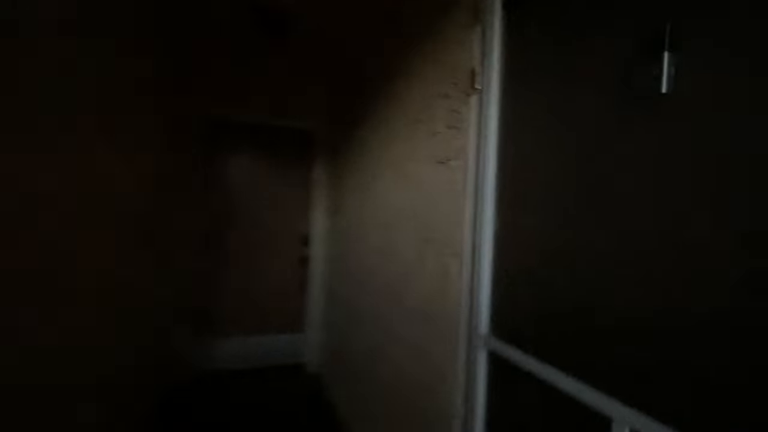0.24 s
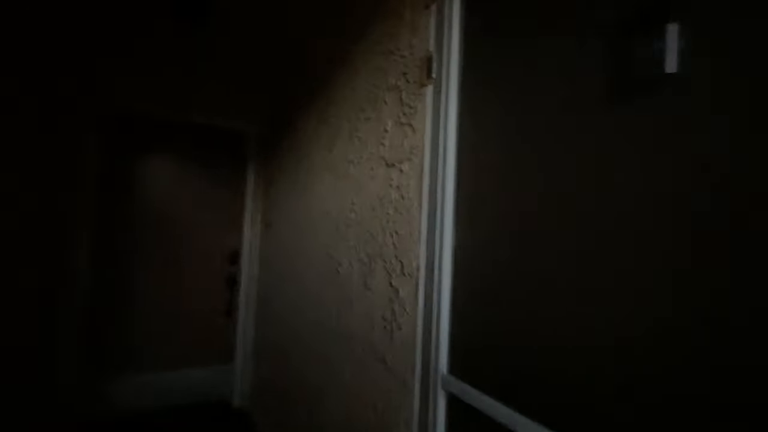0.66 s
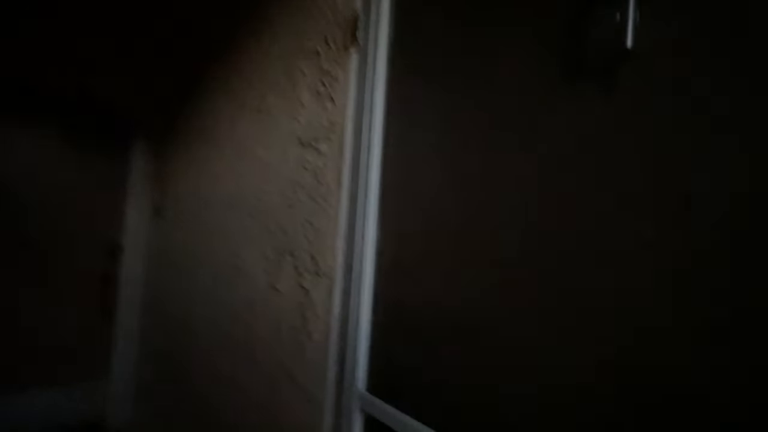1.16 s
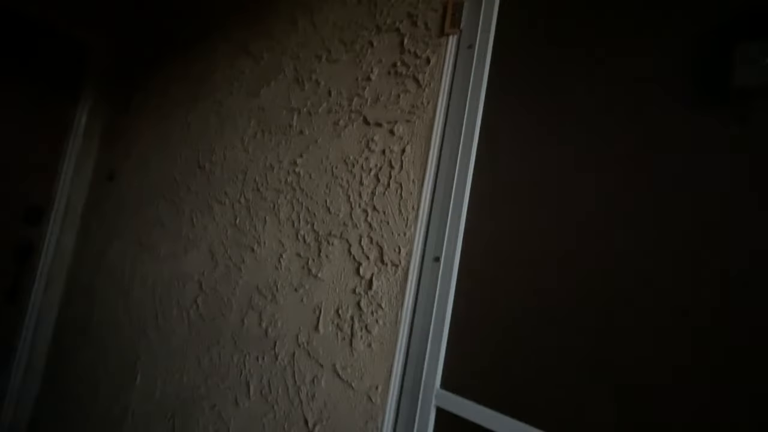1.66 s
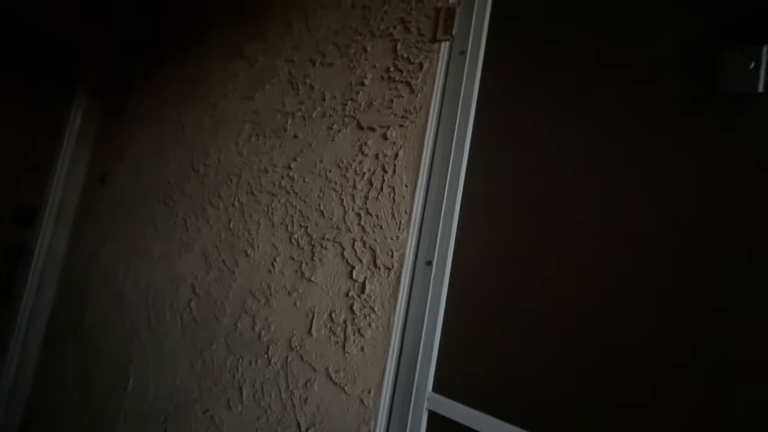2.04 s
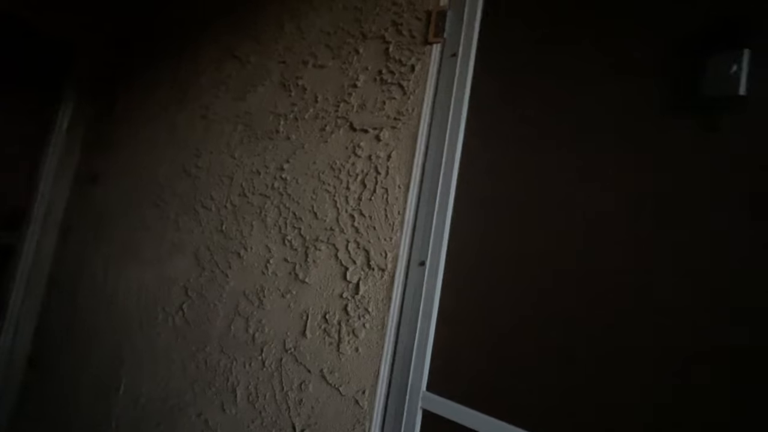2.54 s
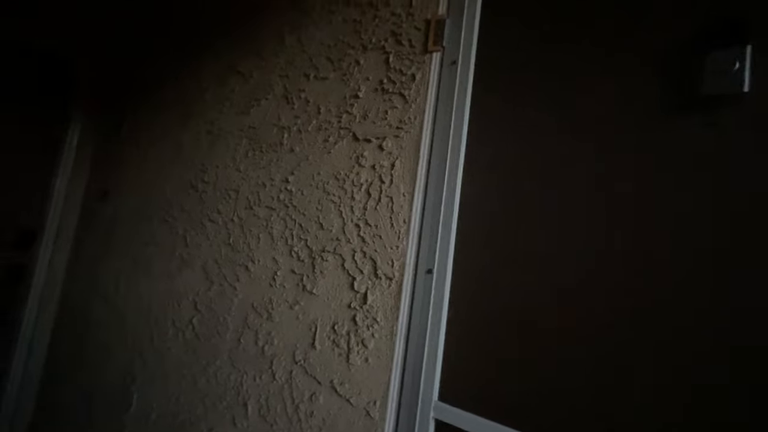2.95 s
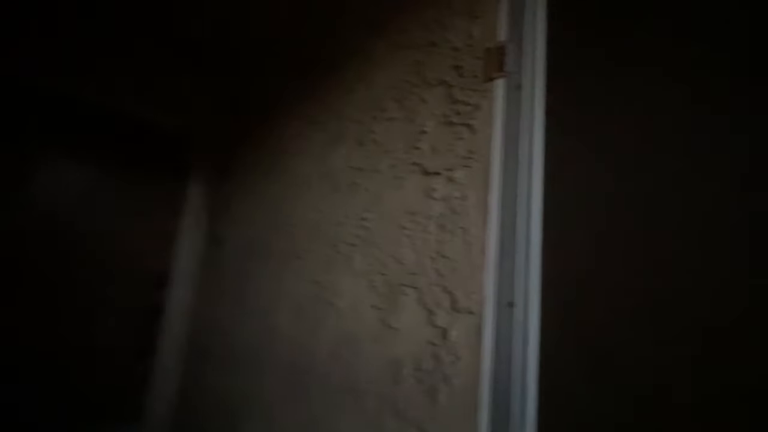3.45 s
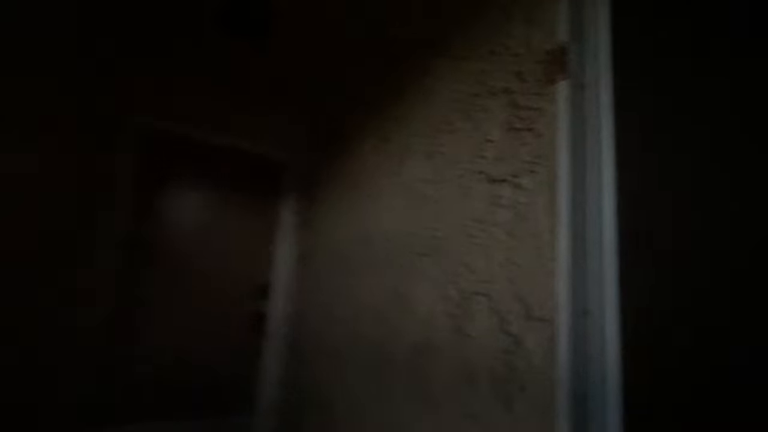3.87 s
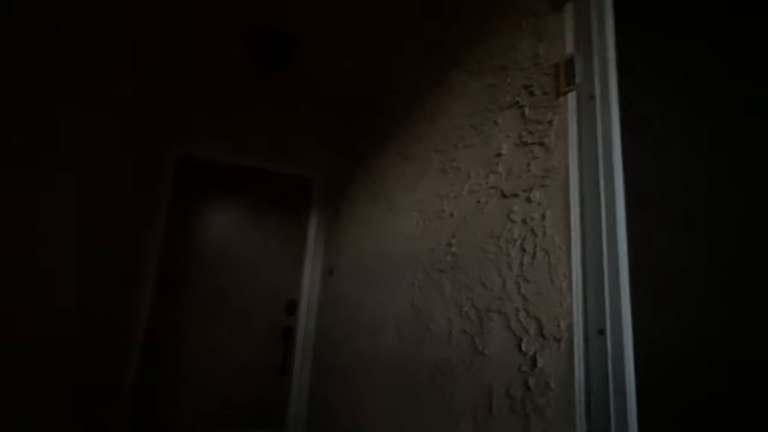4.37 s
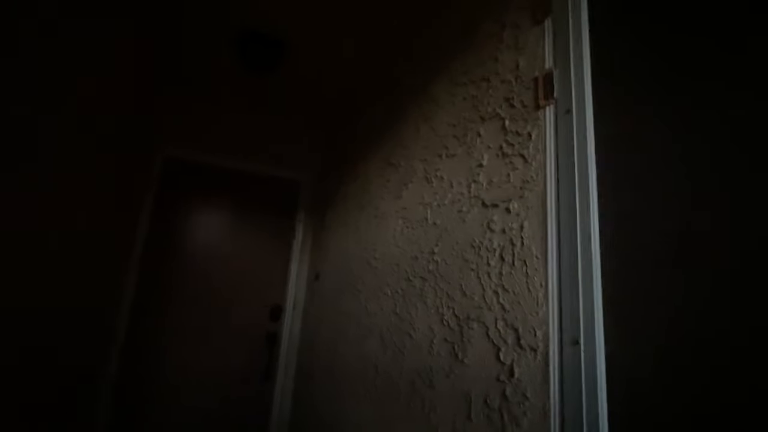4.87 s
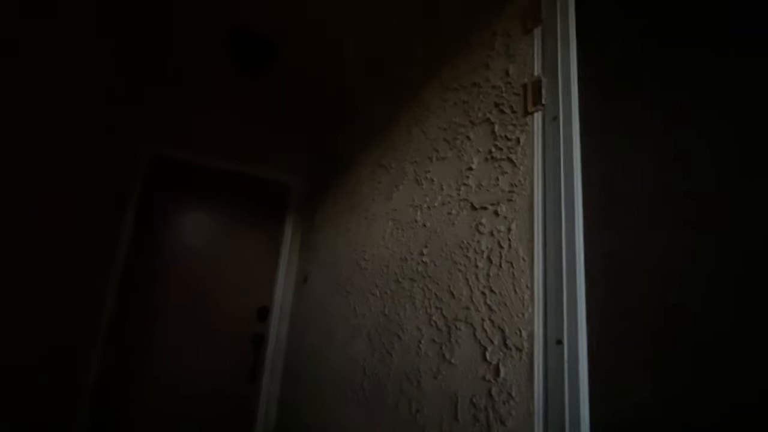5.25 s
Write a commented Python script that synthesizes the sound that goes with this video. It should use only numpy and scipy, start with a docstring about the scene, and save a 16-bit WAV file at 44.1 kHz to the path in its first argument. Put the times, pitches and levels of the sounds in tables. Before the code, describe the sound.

Faint key jingle, soft footfalls and rustling clothes in a narrow hallway, then a quick run of hard knuckle knocks booms on a loose, rattling door.

```python
"""Keys tick and soles land as a visitor steps up, clothes rustling, a nearby hum soon stopping; traffic rumbles outside.
Then knuckles rap on a loose door in a hard, narrow hallway; it booms, slaps back into its frame, its latch rattles.
Door: resonator-filtered echo tails plus decaying sines. Keys and latch: sines and noise clicks. Soles: filtered tails.
Cloth and traffic: shaped noise. Two spaced microphones hear the low middle out of phase."""
import sys
import numpy as np
from scipy import signal
from scipy.fft import rfft, irfft, next_fast_len
from scipy.io import wavfile
from scipy.ndimage import uniform_filter1d, map_coordinates

SR = 44100
rng = np.random.default_rng(int(sys.argv[2]) if len(sys.argv) > 2 else 0)


def to_wav(sig):
    """Store sig (one row per channel, or 1-D mono) as 16-bit WAV at the path in sys.argv[1].

    Samples outside -1..1 are clipped; the rate is SR.
    """
    pcm = np.clip(np.atleast_2d(sig), -1, 1) * 32767
    pcm = np.round(pcm).astype(np.int16)
    wavfile.write(sys.argv[1], SR, pcm.T)  # frames by channels


N = 242991

# Levels in the tables are relative; each source adds its own trim.
# distant traffic: t/s, rumble level/dB, wash level/dB
TRAFFIC = [(0.0, -55.5, -50.5), (0.35, -58, -53), (0.71, -53, -51), (0.86, -53, -55), (1.42, -51, -56),
           (1.61, -58, -59), (2.24, -58.5, -57.5), (2.91, -55, -58), (3.26, -57.5, -50), (3.47, -59, -58),
           (3.7, -58, -56)]
# traffic rumble spectrum: f/Hz, density/dB
RUMBLE_SPECTRUM = [(12, -64), (20, -43), (41, -9.5), (59, 8), (102, -7), (152, -2.5), (178, -23.5),
                   (250, -19), (320, -78), (550, -120)]
# traffic wash spectrum: f/Hz, density/dB
WASH_SPECTRUM = [(88, -62), (150, -4.5), (197, -8.5), (631, -7), (827, -12), (1760, -22.5), (2650, -40.5),
                 (5540, -44.5), (8170, -48), (10500, -56), (13000, -60), (15500, -88)]
# nearby machine, stops early: f/Hz, level/dB
HUM = [(125, -60.5), (665, -66.5), (787, -64)]
# strokes of cloth and soles: peak t/s, level/dB, rise per 20 dB/s, fall per 20 dB/s, treble over body/dB
STROKES = [(0.149, -40.5, 0.013, 0.11, 9), (.54, -51.5, 0.28, 0.23, 1), (.8, -52, 0.14, 0.083, 3),
           (0.899, -53, 0.02, 0.076, 8), (.99, -57.5, 0.028, 0.42, -20), (1.341, -43, 0.032, 0.076, 9),
           (1.49, -62.5, 0.0098, 0.23, -2.5), (1.7, -69.5, 0.015, 0.14, 5), (1.84, -63.5, 0.11, 0.1, -1),
           (2.1, -58.5, 0.13, 0.13, 1.5), (2.49, -67.5, 0.087, 0.16, -5), (2.82, -71, 0.061, 0.089, -3),
           (3.045, -58.5, 0.015, 0.29, 10), (3.176, -60, 0.16, 0.014, 16), (3.319, -51, 0.1, 0.073, 1),
           (3.45, -64, 0.12, 0.59, 0.5), (3.739, -39, 0.025, 0.12, -0.5), (3.78, -49, 0.047, 0.69, -34)]
# rustle spectrum: f/Hz, density/dB
CLOTH_SPECTRUM = [(240, -44), (400, -39), (772, 7.5), (1080, 1.5), (4840, -8.5), (5560, -12.5),
                  (6380, -8.5), (9070, -10.5), (11100, -20.5), (13900, -23), (15500, -62)]
# soles landing: t/s, level/dB, hollow note f/Hz
STEPS = [(0.017, -39.5, 288), (0.143, -39, 756), (0.787, -34.5, 660), (1.317, -31, 310), (1.497, -49, 250),
         (3.073, -34, 615), (3.112, -35.5, 760), (3.248, -38.5, 770)]
# sole impact spectrum: f/Hz, density/dB
SOLE_SPECTRUM = [(100, -24), (330, 3), (900, 0), (2000, -7), (6000, -26)]
# bright metal ticks, keys early on, the door latch rattling during the knocks: t/s, level/dB, ring offset/dB
METAL_TICKS = [(0.143, -34, -22), (0.3172, -55, -7), (0.587, -51, -7), (0.889, -56.5, -8),
               (0.9023, -43.5, -11), (0.98, -47.5, -9), (1.0158, -46, -8), (1.0914, -54, -8),
               (1.12, -56, -8), (1.2673, -42, -11), (1.498, -57, -12), (3.437, -55, -12), (3.714, -53, -4),
               (4.42, -32, -20), (4.482, -32.5, -11.5), (4.672, -31, -20)]
# ringing modes of the metal: f/Hz, level/dB, t60/s
METAL_MODES = [(4790, 7.5, 0.033), (5030, 3, 0.029), (6510, 9.5, 0.032), (8450, 11, 0.028),
               (8900, 15, 0.014), (10200, 3, 0.021), (13600, -1, 0.03)]
# short pitched ticks near the microphones: t/s, level/dB, f/Hz
TAPS = [(.143, -31.5, 2140), (.16, -33, 3760), (0.207, -29, 8700), (.414, -41.5, 1654), (1.317, -42, 1100),
        (1.319, -36, 290), (1.499, -41, 700), (1.705, -43, 8700), (3.113, -36, 795), (3.148, -39, 756),
        (3.228, -45, 3150), (3.229, -37.5, 1060), (3.251, -41, 1190), (3.437, -42, 8600),
        (3.737, -25, 8540), (3.757, -30, 3110)]
# standing waves of the hallway: f/Hz, level/dB
STANDING_WAVES = [(54, -6.5), (63, -2), (76, -2.5), (95, -11), (145, -8)]
# door contacts, blows and rebounds: t/s, boom level/dB, clack offset/dB, direct thud offset/dB, thud f/Hz
KNOCKS = [(3.757, -17, 8, -10, 560), (3.913, -27.5, 13, -22, 696), (4.021, -8.5, 14, 10.5, 710),
          (4.047, -18, 17, 14, 703), (4.081, -15, 12, 14, 1080), (4.126, -31, 15, -7, 720),
          (4.203, -9.5, 12, -18, 600), (4.227, -9.5, 17.5, -6, 730), (4.274, -15, 14, 13, 1070),
          (4.389, -9, 10.5, 8, 466), (4.415, -14, 16.5, 8, 826), (4.474, -8.5, 11.5, 1, 770),
          (4.578, -8, 11, 12, 745), (4.607, -18.5, 18.5, 7, 725), (4.665, -14, 16.5, 7.5, 332),
          (4.763, -13, 16, 15, 758), (4.788, -19.5, 8.5, 17.5, 696), (4.856, -14.5, 12, -10, 860),
          (4.957, -10.5, 12, 12, 732), (4.994, -17.5, 15, 18, 848), (5.15, -35.5, 19.5, -5, 700),
          (5.188, -34.5, 16.5, -7, 700), (5.28, -33.5, 14.5, -17, 680), (5.447, -40.5, 12, -7, 673)]
# panel and hallway resonances: f/Hz, width/Hz, level/dB
DOOR_MODES = [(142, 29, -1), (198, 4.1, -1), (313.4, 8.5, 3), (346.5, 10.3, 4), (408, 23, -7.5),
              (472, 22, 0.5), (544.3, 18, 1), (620, 81, -2), (705, 20.5, -0.5), (754, 39, -2),
              (844, 16, -12), (936, 18, -4), (1033, 29, 0), (1118, 11, -3.5), (1250, 20, -4),
              (1447, 11, -2)]
# door boom spectrum: f/Hz, density/dB
BOOM_SPECTRUM = [(60, -48), (110, -7), (150, 1.5), (300, 4), (800, 7), (1500, -2.5), (3000, -7),
                 (6000, -61)]
# latch and frame clack spectrum: f/Hz, density/dB
CLACK_SPECTRUM = [(710, -14), (1200, 1.5), (1600, 3), (1820, 1.5), (2950, -10), (4150, -8), (5550, -14.5),
                  (6170, -9), (7480, -17.5), (8240, -11.5), (10700, -23), (13500, -26), (15500, -85)]
# hallway decay: f/Hz, t60/s
HALL_T60 = [(60, 1), (300, 0.76), (1000, 0.43), (3000, 0.51), (12000, 0.27)]
# stereo width per band, nearly mono at the very top: f/Hz, left-right correlation/1
STEREO_CORRELATION = [(30, 0.47), (80, 1), (140, 0.14), (290, 0.51), (480, -0.34), (700, -0.64),
                      (1200, -0.21), (2000, -0.086), (4000, -0.005), (9000, -0.093), (10800, -0.84),
                      (12300, 1), (15000, 1)]
# microphone balance: f/Hz, left over right/dB
LEAN = [(60, 5), (120, 1.5), (240, 4), (480, 5), (950, 1), (1890, 2.5), (3770, 5.5), (7520, 5.5),
        (15000, -4.5)]

TOP_HZ, WHINE_HZ = 15830, 8050
FIDGET_DB, SETTLES_DB_PER_S = -55.5, 32.5  # steady rubbing, fading as the visitor comes to a stand


def amp(db):
    """dB to amplitude."""
    return 10 ** (np.asarray(db) / 20)


def unit(x):
    """Scale to rms 1."""
    return x / np.sqrt(np.mean(x ** 2) + 1e-20)


def along(points, hz):
    """Interpolate (f/Hz, value) points on a log-frequency axis."""
    f, v = np.transpose(points)
    return np.interp(np.log(hz + 1), np.log(f + 1), v)


def curves(rows):
    """One value per sample for each column after the time."""
    s, *cols = np.transpose(rows)
    return [np.interp(np.arange(N) / SR, s, c) for c in cols]


def wobble(rate_hz):
    """Smooth random curve, rate_hz knots per second."""
    knots = rng.standard_normal(int(N * rate_hz / SR) + 4)
    return map_coordinates(knots, [np.arange(N) * rate_hz / SR])


def filtered(x, response):
    """Apply a complex frequency response."""
    m = next_fast_len(x.shape[-1] + SR // 2)
    hz = np.fft.rfftfreq(m, 1 / SR)
    return irfft(rfft(x, m) * response(hz), m)[..., :x.shape[-1]]


def causal(points):
    """Minimum-phase response shaped by (f/Hz, dB) points, rms gain 1."""
    def response(hz):
        cepstrum = irfft(np.log(amp(along(points, hz)) + 1e-6))
        cepstrum[1:len(hz) - 1] *= 2  # fold onto positive time
        cepstrum[len(hz):] = 0
        gain = np.exp(rfft(cepstrum))
        return gain / np.sqrt(np.mean(np.abs(gain) ** 2))
    return response


def spread(pair):
    """Mix two unrelated signals to the left-right correlation of each band."""
    def mid_side_gains(hz):
        turn = np.arccos(np.clip(along(STEREO_CORRELATION, hz), -1, 1)) / 2
        return np.array([np.cos(turn), np.sin(turn)])
    mid, side = filtered(pair, mid_side_gains)
    return np.array([mid + side, mid - side])


def rush(spectrum, patchy_db):
    """Noise pair of rms 1 with time-frequency patches of random gain."""
    z = signal.stft(rng.standard_normal((2, N)), nperseg=512)[2]
    field = uniform_filter1d(rng.standard_normal(z.shape[1:]), 6, 0)
    field = uniform_filter1d(field, 10, 1)
    pair = signal.istft(z * amp(patchy_db * unit(field)), nperseg=512)[1][:, :N]
    return unit(filtered(pair, lambda hz: amp(along(spectrum, hz))))


def hallway(build_s, slap_db, slap_s, spiky_db, tint_db=0):
    """Fresh echo-tail pair: reflections pile up, the far wall slaps back, each band has its own decay."""
    t = np.arange(SR) / SR
    slap = amp(slap_db) * np.exp(-((t - slap_s) / 0.027) ** 2)
    swell = 1 - np.exp(-t / build_s) + slap
    lumps = amp(spiky_db * np.repeat(rng.standard_normal(SR // 100), 100))  # uneven reflections
    hz, s, z = signal.stft(rng.standard_normal((2, SR)), SR, nperseg=512)
    tint_db = tint_db * unit(uniform_filter1d(rng.standard_normal(len(hz)), size=4))  # colour of this tail
    decay_db = -60 * s / along(HALL_T60, hz)[:, None]
    tail = signal.istft(z * amp(tint_db[:, None] + decay_db), SR, nperseg=512)[1][:, :SR]
    tail = tail * swell * lumps
    return tail / np.linalg.norm(tail[0])


def strikes(times_s, levels_db, **hall):
    """Every contact excites its own echo tail."""
    out = np.zeros((2, N + SR))
    for s, db in zip(times_s, levels_db):
        start = round(s * SR)
        out[:, start:start + SR] += amp(db) * hallway(**hall)
    return out[:, :N]


def street():
    """Distant traffic as shaped noise, wavering hum sines, and a faint narrow-band whine."""
    rumble_db, wash_db = curves(TRAFFIC)
    t = np.arange(N) / SR
    whine_band = lambda f: np.exp(-((f - WHINE_HZ) / 40) ** 2)
    whine = unit(filtered(rng.standard_normal((2, N)), whine_band))
    hum = sum(amp(db + 6.5 + 1.1 * wobble(7.0)) * np.sin(2 * np.pi * hz * t) for hz, db in HUM)
    hum = hum / (1 + np.exp((t - 1.25) / 0.11))  # stops around 1.25 s
    rumble = amp(rumble_db + 6.0 + 4.8 * wobble(5.03)) * rush(RUMBLE_SPECTRUM, patchy_db=-1.5)
    wash = amp(wash_db + 2.5 + 0.8 * wobble(3)) * rush(WASH_SPECTRUM, patchy_db=1.5)
    return rumble + wash + amp(-91.0) * whine + hum


def rubbing():
    """Body and treble gains of the rustle: exponential strokes over a settling bed."""
    t = np.arange(N) / SR
    body = amp(FIDGET_DB - SETTLES_DB_PER_S * t)
    bright = body * amp(-5)
    for s, db, rise_s, fall_s, treble_db in STROKES:
        stroke = amp(db - 20 * np.maximum((s - t) / rise_s, (t - s) / fall_s))
        body = body + stroke
        bright = bright + amp(treble_db) * stroke
    return body, bright


def footsteps():
    """Soles land softly: echo tails through a resonator at the hollow note."""
    steps, width_hz = 0, 120
    for s, db, hz in STEPS:
        blow = strikes([s - 0.002], [db + 12], build_s=0.002, slap_db=-9, slap_s=0.03, spiky_db=2.5)
        blow[:, round(s * SR)] += amp(db + 8.0) * np.array([1, -1])  # first arrival, opposite polarity

        def sole(f):
            damping = 1j * f * width_hz
            return causal(SOLE_SPECTRUM)(f) * (0.5 + 2.5 * damping / (hz * hz - f * f + damping))
        steps = steps + filtered(blow, sole)
    return amp(5.0) * steps


def cloth():
    """Clothes and soles rub: grainy noise, body and treble gated by separate stroke gains."""
    grain = amp(1.56 * wobble(140) + 1.65 * wobble(28.84))
    body, bright = rubbing()
    rustle = unit(grain * rush(CLOTH_SPECTRUM, patchy_db=2.2))
    treble = filtered(rustle, lambda f: 1 / (1 + (5000 / (f + 1)) ** 4))
    return body * (rustle - treble) + bright * treble


def metal_ticks():
    """Each tick of keys or latch is a noise click plus metal modes with random strength and pitch."""
    clicks, rings, t = np.zeros(N + SR), np.zeros(N + SR), np.arange(SR // 8) / SR
    bounces = [(s + 0.013 * (1 + rng.random()), db - 14.5, ring_db) for s, db, ring_db in METAL_TICKS]
    jingle = [(rng.uniform(0.25, 1.25), rng.normal(-59.5, 2.8), -8) for _ in range(12)]  # faint ticks
    for s, db, ring_db in [*METAL_TICKS, *bounces, *jingle]:
        start, ring = round(s * SR), 0
        for hz, level_db, t60_s in METAL_MODES:
            envelope = amp(level_db + rng.normal(0, 2.6) - 60 * t / t60_s)
            drift = 0.17 * np.cumsum(rng.standard_normal(len(t)))  # phase drift/rad
            ring = ring + envelope * np.sin(2 * np.pi * hz * rng.normal(1, 0.0098) * t + drift)
        rings[start:][:len(t)] += amp(db + 0.5 + ring_db) * ring * (1 - np.exp(-t / 0.00041))
        click = amp(db - 3.5 - 60 * t / 0.02) * rng.standard_normal(len(t))
        clicks[start:][:len(t)] += click * (1 - np.exp(-t / 0.0014))
    click_spectrum = [(2000, -10), (4500, -10), (9000, -11.0), (11500, -3), (15500, -13)]  # f/Hz, density/dB
    return rings + filtered(clicks, causal(click_spectrum))


def near_taps():
    """Single short decaying notes with phase drift, without hallway echo."""
    taps, t = np.zeros(N + SR), np.arange(SR // 8) / SR
    for s, db, hz in TAPS:
        envelope = amp(db - 60 * t / (0.0047 + 15 / hz)) * (1 - np.exp(-t / 0.00011))
        drift = 0.00004 * hz * np.cumsum(rng.standard_normal(len(t)))
        taps[round(s * SR):][:len(t)] += envelope * np.sin(2 * np.pi * hz * t + drift)
    return taps


def small_ticks():
    """Metal ticks echo in the hallway; the direct part adds the near taps."""
    metal = metal_ticks()
    hall = hallway(build_s=0.004, slap_db=-9, slap_s=0.03, spiky_db=1.5)
    wet = signal.fftconvolve(metal[None, :N], hall, axes=1)
    return amp(-4.5) * wet[:, :N], (metal + near_taps())[:N]


def standing():
    """Every door contact sets the lowest standing waves going; they swell, hold, then die away."""
    out, t = np.zeros(N + SR), np.arange(SR // 2) / SR
    shape = (1 - np.exp(-t / 0.024)) * amp(-110 * np.maximum(t - 0.16, 0))
    for s, db, *_ in KNOCKS:
        waves = 0
        for hz, level_db in STANDING_WAVES:
            cycles = hz * rng.normal(1, 0.038) * t + rng.random()
            waves = waves + amp(level_db) * np.sin(2 * np.pi * cycles)
        out[round(s * SR):][:len(t)] += amp(0.52 * db - 27.5) * shape * waves
    return out[:N]


def panel(f):
    """Door response: damped second-order resonances over a weak direct path."""
    response = amp(-20)
    for centre_hz, width_hz, level_db in DOOR_MODES:
        damping = 1j * f * width_hz
        response = response + amp(level_db) * damping / (centre_hz ** 2 - f * f + damping)
    return response


def door_thud():
    """The struck spot rings for a few cycles, with the knuckle's sharp push."""
    thud, t = np.zeros(N + SR), np.arange(SR // 20) / SR
    for s, boom_db, _, thud_db, hz in KNOCKS:
        db = boom_db + thud_db
        envelope = amp(db - 7.5 - 60 * t / 0.056) * (1 - np.exp(-t / 0.00074))
        thud[round(s * SR):][:len(t)] += envelope * np.sin(2 * np.pi * hz * t)
        u = t / 0.00024
        push = amp(db - 9.5) * u * u * (3 - u) * np.exp(-u)
        thud[round((s + 0.003) * SR):][:len(t)] += push  # 3 ms after the ring starts
    return thud[:N]


def door():
    """The panel thuds and booms; the slack in latch and frame clacks a moment later."""
    s, db, clack_db, _, _ = np.transpose(KNOCKS)
    boom = strikes(s - 0.002, db + 25.5,
                   build_s=0.0012, slap_db=-4.0, slap_s=0.06, spiky_db=2.0, tint_db=2.5)
    clack = strikes(s + 0.0015, db + clack_db,
                    build_s=0.0065, slap_db=-3.0, slap_s=0.024, spiky_db=1.5, tint_db=2.0)
    boom = filtered(filtered(boom, causal(BOOM_SPECTRUM)), panel)
    clack = filtered(clack, causal(CLACK_SPECTRUM))
    thud = door_thud()
    hall = hallway(build_s=0.0034, slap_db=-3, slap_s=0.031, spiky_db=2.0)
    echo = signal.fftconvolve(thud[None], hall, axes=1)[:, :N]
    return boom + clack + amp(-4.0) * echo, thud


def scene():
    """Stereo-spread sound of hallway, visitor and street plus the direct sound at each microphone."""
    door_wet, thud = door()
    ticks_wet, ticks = small_ticks()
    late_thud = np.pad(thud, (24, 0))[:N]  # 24 samples: the door is nearer the right microphone
    direct = np.array([amp(-2.5) * late_thud, thud]) + standing() + ticks * amp([[0.3], [-1.5]])
    diffuse = spread(door_wet + ticks_wet + footsteps() + cloth() + street())
    return diffuse + direct


def record(dry):
    """Left-right balance per frequency, soft peak limiting, sharp low-pass at TOP_HZ."""
    x = filtered(dry, lambda hz: amp(along(LEAN, hz) / 2 * np.array([[1], [-1]])))
    x = x / (1 + np.abs(x / 0.82) ** 3) ** (1 / 3)
    return filtered(x, lambda hz: hz < TOP_HZ)


dry = scene()
out = record(dry)
to_wav(out)
```